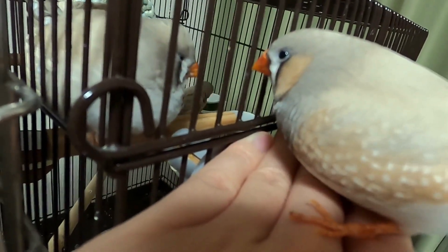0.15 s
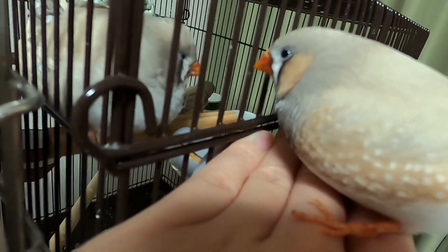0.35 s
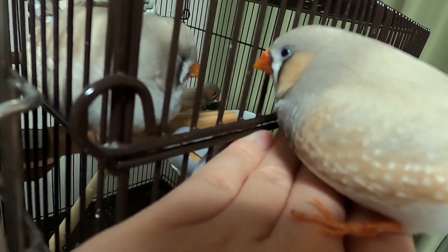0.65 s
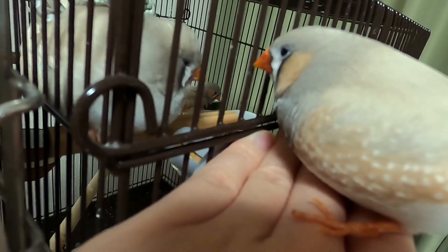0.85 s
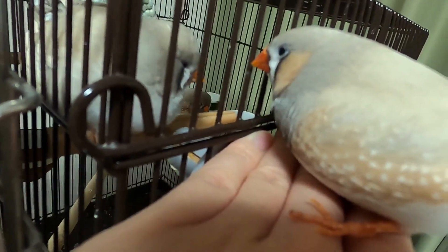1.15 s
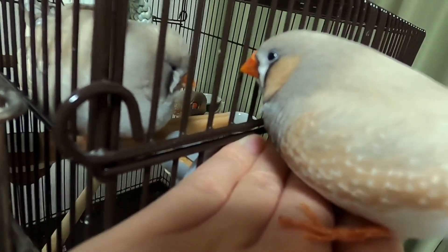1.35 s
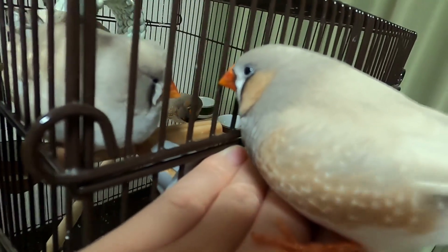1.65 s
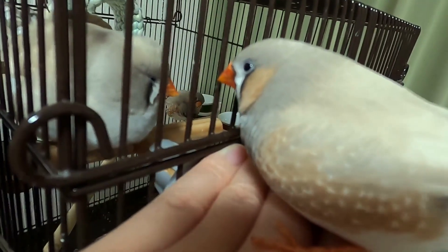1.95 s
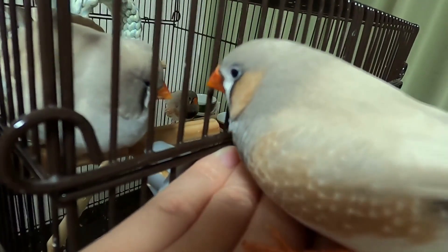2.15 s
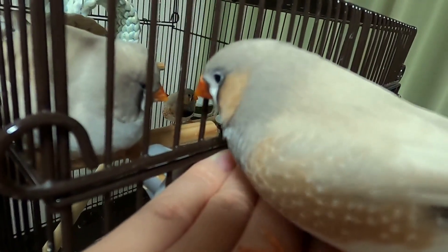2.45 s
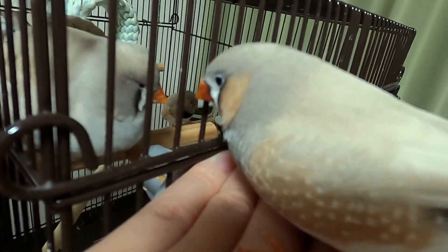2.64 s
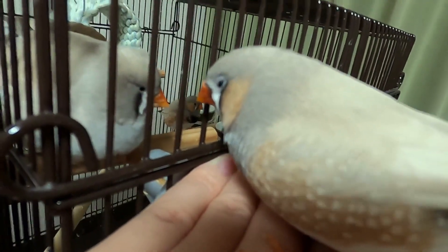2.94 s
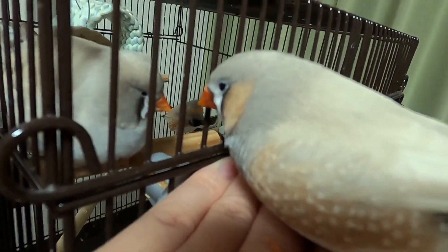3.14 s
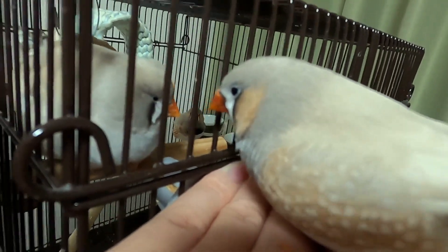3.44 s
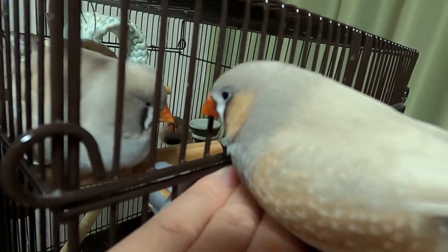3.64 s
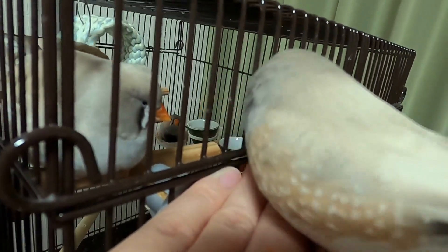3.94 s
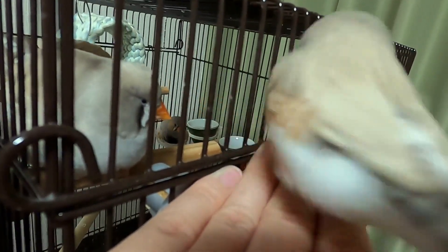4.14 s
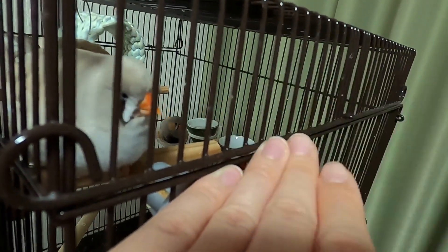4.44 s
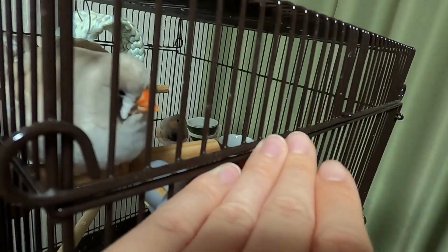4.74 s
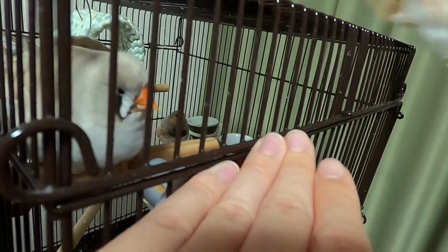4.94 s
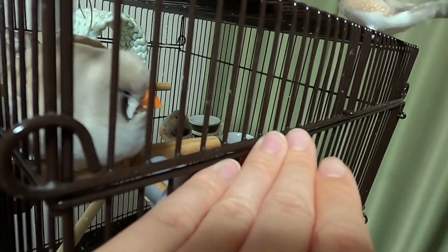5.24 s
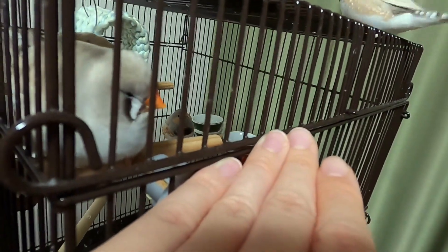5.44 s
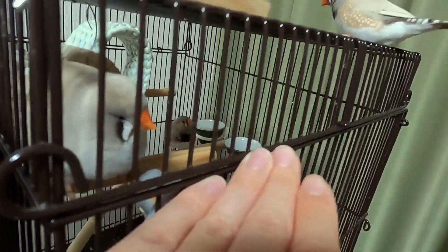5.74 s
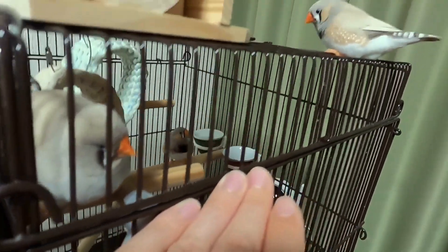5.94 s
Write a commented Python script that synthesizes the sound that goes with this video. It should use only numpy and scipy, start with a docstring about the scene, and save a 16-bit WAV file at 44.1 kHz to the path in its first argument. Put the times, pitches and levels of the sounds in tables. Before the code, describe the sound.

Small birds give short calls among faint cage wire rattles, then one flutters up close by and lands on the cage.

```python
"""A faint rattle of wire in a quiet room, then finches calling in and beside their cage, close to two
microphone ports. Each call is a train of syrinx pulses filtered by the throat; hops and pecks excite
the damped modes of the wires. One bird pushes off, its wingbeats and a turbulent gust strike the
ports, and it calls in flight and lands on the cage roof."""
import sys
import numpy as np
from scipy import signal
from scipy.io import wavfile
from scipy.ndimage import uniform_filter1d

SR = 44100
rng = np.random.default_rng(int(sys.argv[2]) if len(sys.argv) > 2 else 0)


def to_wav(sig):
    """Store sig (one row per channel, or 1-D mono) as 16-bit WAV at the path in sys.argv[1].

    Samples outside -1..1 are clipped; the rate is SR.
    """
    pcm = np.clip(np.atleast_2d(sig), -1, 1) * 32767
    pcm = np.round(pcm).astype(np.int16)
    wavfile.write(sys.argv[1], SR, pcm.T)  # frames by channels


N = 268304

# noise between the ports: (frequency [Hz], correlation [0-1]) and (frequency [Hz], L-R [dB])
COHERENCE = [(60, 0.82), (180, 0.6), (550, 0.71), (1650, 0.6), (4970, 0.4), (15000, 1)]
NOISE_BALANCE = [(60, -1.5), (240, -3.5), (950, -1), (3770, 3.5), (15000, 0)]
# reverberation: (frequency [Hz], T60 [s])
ROOM_DECAY = [(300, 0.23), (1500, 0.28), (4000, 0.22), (10000, 0.08)]
# noise spectra: (frequency [Hz], relative density [dB])
AIR_SPECTRUM = [(35, -36), (60, -7), (105, -26), (179, 8.5), (272, 2), (385, -1), (475, -9), (613, -24.5),
                (849, -10), (1100, -16), (1230, -22.5), (1960, -47), (3840, -37), (7720, -32.5),
                (15500, -70.5)]
SHUFFLE_SPECTRUM = [(290, -28.5), (500, 4), (874, -10), (1080, 1.5), (1470, -2.5), (1750, 0), (2310, -7.5),
                    (2930, -13), (3130, -14), (12000, -37), (15600, -64), (22000, -120)]
RING_SPECTRUM = [(90, -50), (200, -20), (245, -12), (268, 0), (295, -14), (400, -40), (1000, -100)]
THRUM_SPECTRUM = [(80, -40), (135, -8), (160, 0), (200, -4), (260, -25), (1000, -100)]
JANGLE_SPECTRUM = [(1470, -34), (2600, -3.5), (4500, -9), (7100, -11), (12200, -26.5), (15500, -46)]  # small links; also feather tips
PUSH_SPECTRUM = [(1000, -35), (1600, -8.5), (2060, 3), (2500, -14.5), (2950, -9.5), (3600, -22),
                 (4250, -12), (5300, -23.5), (7500, -45), (12000, -75)]
GUST_SPECTRUM = [(12, -29.5), (30, 5.5), (110, -2), (190, 2), (400, -5.5), (800, -16), (1300, -29),
                 (1800, -43), (2600, -62), (6000, -115)]
SWISH_SPECTRUM = [(180, -36.5), (300, -4), (877, -7), (985, 1.5), (1090, -5.5), (1750, -6), (1940, -12.5),
                  (3070, -16), (4880, -29), (11300, -53), (15500, -66.5)]
# background envelopes: (time [s], level [dB])
SHUFFLE_LEVELS = [(0, -67), (.19, -78), (.63, -76), (.79, -60), (.95, -76.5), (1.3, -61.5), (1.45, -78),
                  (1.75, -60.5), (2.17, -72), (2.5, -65), (3.3, -71.5), (3.8, -69), (4.3, -63.5),
                  (5.17, -66.5), (5.5, -77), (6.08, -76.5)]
RUMBLE_LEVELS = [(0, -86), (.7, -88), (1.3, -71), (1.75, -82), (2.15, -72), (2.55, -84), (3.4, -70),
                 (3.8, -83), (4.3, -70), (5.17, -69), (5.5, -86), (6.08, -86)]
# dull, distant scuffles: (time [s], level [dB], decay [s])
FAR_SCUFFLES = [(0.872, -56, 0.025), (1.602, -63, 0.24), (3.47, -53.5, 0.17), (5.1, -59.5, .1)]
# spells of a low ring and a duller thrum: (start [s], end [s], level [dB])
RING_SPELLS = [(0.03, 0.18, -64), (0.749, 0.892, -58.5), (1.231, 1.362, -56), (1.612, 1.845, -62),
               (2.478, 2.783, -60.5), (2.94, 3.22, -70.5), (3.497, 3.617, -53.5), (3.627, 3.756, -51)]
THRUM_SPELLS = [(3.5, 3.85, -61), (5.8, 6.04, -62.5)]
# wire modes: (frequency [Hz], level [dB]); their damping by the frame: (frequency [Hz], T60 [s])
WIRE_MODES = [(725, 0), (990, 0), (1300, -12), (1550, -10), (1700, 5.5), (1900, 8.5), (2060, 5.5),
              (2650, 2), (3040, -10), (3480, -4), (4200, 4.5), (4600, 3.5), (5200, -6), (5990, -3),
              (6800, 3), (7200, -3), (7900, -1), (9150, -1.5)]
WIRE_DECAY = [(1000, .06), (3000, .04), (9000, .025)]
# rattles: (time [s], level [dB], first wires [Hz], second wires [Hz], decay [s], jangle [dB], L-R [dB])
WIRE_RATTLES = [(.005, -57, 980, 7800, .024, -4.5, -1), (.196, -57.5, 3250, 2000, .043, -14, 4),
                (1.05, -59, 1205, 2740, .15, -16.5, 2.5), (1.216, -65, 7700, 1800, .06, 7, 2),
                (1.375, -72.5, 5960, 7850, .05, 1.2, 7), (1.677, -64, 7850, 1700, .031, -1.5, 4),
                (3.335, -61, 6750, 5200, .02, -4, 0), (3.375, -64, 6700, 7200, .06, -12, 0),
                (3.81, -70, 7300, 7900, .05, -8, 0), (3.906, -49.5, 1800, 4100, .048, -7, -1.2),
                (4.011, -51, 3040, 7200, .1, -9, 1.2), (4.091, -59, 1900, 2630, .027, -5, 7.5),
                (4.164, -50, 1950, 5990, .046, -10.5, 3.5), (5.038, -37, 3300, 2650, .03, -6, 2),
                (5.08, -51, 725, 1080, .22, -25, -1.5), (5.52, -61, 725, 2060, .08, -25, -1.5),
                (5.36, -68, 3480, 5200, .035, 3, -2.2), (5.556, -73, 5200, 1800, .025, 3, 0),
                (5.695, -56, 1700, 4670, .064, -17.5, 3), (5.825, -60, 1800, 2940, .045, -2.5, 8),
                (5.909, -58, 2060, 7200, .025, -19, 10.5)]
# claw and beak impacts: (time [s], peak [dB], centre [Hz], knock length [cycles], L-R [dB])
IMPACTS = [(.861, -61, 7000, 3.4, 2), (.886, -49, 3200, 2.9, -1), (1.47, -62, 3300, 1.1, -4),
           (1.605, -65, 6000, 2, 3), (1.73, -58.5, 5500, 1.8, 1), (2.465, -64, 5500, 1.5, 3),
           (2.532, -66, 5500, 1.5, 3), (2.592, -67, 5500, 1.5, 3), (2.647, -66, 5500, 1.5, 3),
           (3.427, -48, 2500, 0.5, -13), (3.912, -53, 4100, .8, 1.5), (4.161, -56, 5500, .8, .5),
           (4.413, -50, 1200, 1.1, -11), (4.447, -45, 2000, 8, -3), (4.458, -35, 1400, 1.5, -4.5),
           (4.461, -46.5, 8960, 2, -16), (4.484, -34, 3500, 0.45, -10), (4.839, -32, 2500, 1, -2),
           (4.878, -41.5, 1800, 0.44, -9), (4.988, -41.5, 1200, 3.4, 2), (5.043, -21, 3200, 0.8, 1),
           (5.567, -48, 2600, .45, 0)]
# gust at the left port, then the right:
# (peak time [s], rise [s], fall [s], turbulence [dB], buffet [Hz], buffet [dB])
PORT_GUSTS = [(4.5555, .009, .005, -12, 190, -7), (4.546, .017, .015, -11, 47, -9)]
# feathers in flight: (time [s], swish [dB], tip rustle [dB])
FEATHER_LEVELS = [(4.37, -69, -64), (4.41, -58.5, -61), (4.48, -56.5, -53.5), (4.545, -62, -66),
                  (4.64, -50.5, -61), (4.85, -50, -64), (4.95, -57.5, -67), (5.03, -55, -61),
                  (5.2, -56, -79)]
# bouts of wingbeats: (first peak [s], period [s], final pitch [Hz], extra pitch at the peak [Hz],
# first L-R [dB], settled L-R [dB], stroke peaks [dB])
WING_BOUTS = [(4.419, .04, 36, 8, -7, -7, [-26, -13, -24]),
              (4.58, .0401, 24.6, 28, 7, -1, [-17, -23, -16.5, -15.5, -17.5, -20, -25.5, -27, -28.5]),
              (5.007, .02, 29.5, 12, .4, .3, [-28, -34, -29])]
# throat responses: (frequency [Hz], harmonic level [dB])
NEAR_FORMANTS = [(260, -50), (450, -17), (557, -27.5), (1100, -3.5), (1650, -5.5), (2200, 1), (2800, -.5),
                 (3390, -5), (4090, -3.5), (6030, -33), (6620, -30), (8650, -30.5), (10300, -46),
                 (12200, -52), (14300, -80)]
CAGED_FORMANTS = [(560, -38.5), (1130, -13), (1700, -17), (2260, -5), (2830, 2), (3400, -11.5), (3950, -8),
                  (4500, -6), (5100, -16.5), (5700, -26), (6500, -33.5), (9000, -64)]
LOW_FORMANTS = [(470, -52), (800, -14.5), (1350, -6), (1620, -8), (1860, -0.5), (3680, -14.5), (3900, -9),
                (4620, -22), (6000, -42), (7800, -72), (13200, -120)]
FLYING_FORMANTS = [(600, -35), (1150, -7), (1750, -3), (2350, 1), (2950, -1.5), (3600, -2), (4200, -18),
                   (5000, -25), (7000, -40.5)]
# by bird: (throat response, rasp [rad], phase scatter [rad], L-R [dB], room feed [dB])
BIRDS = {"near": (NEAR_FORMANTS, .17, .3, .6, -8.5), "caged": (CAGED_FORMANTS, .15, 1.4, 4.5, -5),
         "low": (LOW_FORMANTS, .22, 1.2, 2.5, -4), "flying": (FLYING_FORMANTS, .38, .6, .6, -6)}
# call contour by bird, at arch depth 1: (pitch rise [s], start below top [share],
# sag 0.05 s after the top [share], swell [s], swell start [dB], attack [s], release [s])
CONTOURS = {"near": (.024, .12, .28, .02, -4, .007, .008), "caged": (.051, .18, .012, .095, -8, .014, .05),
            "low": (.025, .11, .12, .03, -4, .009, .015), "flying": (.022, .08, .09, .025, -6, .004, .01)}
# calls: (bird, start [s], length [s], effort [dB], top pulse rate [Hz], arch depth [factor])
CALLS = [("caged", .398, .17, -48, 565, 1.0), ("near", .692, .066, -45, 574, 1.0),
         ("caged", 1.14, .125, -53, 560, 1.0), ("low", 1.225, .075, -50, 461, 1.0),
         ("low", 1.568, .062, -53, 463, 1.1), ("caged", 1.765, .11, -56, 556, .9),
         ("near", 2.37, .069, -42, 573, 1.0), ("caged", 3.597, .065, -55, 562, .9),
         ("near", 3.65, .063, -40, 565, 1.0), ("flying", 4.678, .074, -38, 590, 1.0),
         ("flying", 4.93, .055, -49.5, 728, .15)]


def amp(db):
    """Decibels to amplitude ratio."""
    return 10 ** (np.asarray(db) / 20)


def unit_rms(x):
    """Normalisation to unit mean power."""
    return x / np.sqrt(np.mean(x ** 2) + 1e-20)


def read(points, hz):
    """Interpolation on a log-frequency axis."""
    f, value = np.transpose(points)
    return np.interp(np.log(hz + 1), np.log(f + 1), value)


def wobble(shape, hz):
    """Random modulation: noise low-passed at hz."""
    return unit_rms(signal.sosfilt(signal.butter(3, hz, fs=SR, output="sos"), rng.standard_normal(shape)))


def envelope(rows, column):
    """Smooth amplitude envelope from a dB column, silent outside the rows."""
    rows = np.asarray(rows)
    gain = amp(np.interp(np.arange(N) / SR, rows[:, 0], rows[:, column], left=-150, right=-150))
    return np.convolve(gain, np.hanning(200) / 100, "same")


def spells(rows):
    """Soft-edged gate, open from start to end of each row."""
    t = np.arange(N) / SR
    return uniform_filter1d(sum(amp(db) * (t > start) * (t < end) for start, end, db in rows), size=600)


def add(mix, start, sound, pan_db):
    """Superposition: a sound joins the mix with a left-right level difference."""
    part = mix[:, round(start * SR):][:, :sound.shape[-1]]
    part += amp([[pan_db / 2], [-pan_db / 2]]) * sound[..., :part.shape[1]]


def noise(spectrum, patchy_db, size=512, coherence=COHERENCE):
    """Partially coherent stereo noise whose spectrum drifts in patches."""
    frames, hz = 4 * N // size + 5, np.fft.rfftfreq(size, 1 / SR)
    a, b, c, d, patches = rng.standard_normal((frames, len(hz), 5)).T
    patches = unit_rms(uniform_filter1d(uniform_filter1d(patches, size=8, axis=0), size=12, axis=1))
    alike = np.clip(read(coherence, hz), -1, 1)[:, None]
    left = a + 1j * b
    right = alike * left + np.sqrt(1 - alike ** 2) * (c + 1j * d)
    lean_db = read(NOISE_BALANCE, hz)[:, None] * np.array([.5, -.5])[:, None, None]
    bins = np.array([left, right]) * amp(read(spectrum, hz)[:, None] + lean_db + patchy_db * patches)
    return unit_rms(signal.istft(bins, nperseg=size, noverlap=size * 3 // 4)[1][:, :N])


def room_tone():
    """Incoherent noises add: steady air, shuffling, a narrow low ring, a thrum and a slow rumble."""
    t = np.arange(N) / SR
    scuffles = sum(amp(db) * (t > s) * np.exp(-abs(t - s) / decay) * np.minimum(abs(t - s) / .006, 1)
                   for s, db, decay in FAR_SCUFFLES)
    shuffling = uniform_filter1d(envelope(SHUFFLE_LEVELS, 1) + scuffles, size=400)
    ring = spells(RING_SPELLS) * noise(RING_SPECTRUM, 1.2, size=4096, coherence=[(20, .85)])
    thrum = spells(THRUM_SPELLS) * noise(THRUM_SPECTRUM, 1.2, size=4096, coherence=[(20, .85)])
    rumble = noise([(15, -12.5), (30, -7.5), (70, -9.5), (110, -22), (300, -65)], 1.5, size=4096)
    rumble *= envelope(RUMBLE_LEVELS, 1) * amp(3 * wobble(N, hz=5))
    air = amp(-64) * noise(AIR_SPECTRUM, 1.5, size=1024)
    return air + shuffling * noise(SHUFFLE_SPECTRUM, 1.8) + ring + thrum + rumble


def reverberation(x):
    """Diffuse reflections of random sign decay exponentially, each band at its own rate."""
    taps = np.zeros((2, SR // 2))
    arrivals = np.arange(130, SR // 2 - 20, 20)
    arrivals = arrivals + rng.integers(0, 20, (2, len(arrivals)))
    np.put_along_axis(taps, arrivals, rng.choice([-1., 1.], arrivals.shape), 1)
    taps[1] = .56 * taps[0] + .94 * taps[1]
    hz, t, bins = signal.stft(taps, SR, nperseg=256)
    tail = signal.istft(bins * amp(-60 * t / read(ROOM_DECAY, hz)[:, None]), SR, nperseg=256)[1]
    return signal.fftconvolve(x, tail / np.linalg.norm(tail[0]), axes=1)[:, :N] * amp([[1.5], [-1.5]])


def rattles():
    """Modal ringing: a dying run of knocks excites two groups of damped wires, and small links jangle."""
    out, t = np.zeros((2, N)), np.arange(SR // 4) / SR
    knocks_per_s, detune = 900, .02
    jangle = noise(JANGLE_SPECTRUM, 2.5, size=256) * unit_rms(amp(1.8 * wobble(N, 250)))
    wire_hz, wire_db = np.transpose(WIRE_MODES)[:, :, None]
    decay = amp(wire_db - 60 * t / read(WIRE_DECAY, wire_hz))
    for start, db, first_hz, second_hz, fade_s, jangle_db, pan_db in WIRE_RATTLES:
        fade = np.exp(-(t / fade_s) ** 1.1) * (1 - np.exp(-t / .0033)) ** 2
        knocks = fade * rng.standard_normal(len(t)) * (rng.random(len(t)) < knocks_per_s / SR)
        struck = np.exp(-(np.log2(wire_hz / first_hz) / .16) ** 2)
        struck += amp(-14) * np.exp(-(np.log2(wire_hz / second_hz) / .22) ** 2)
        hz = wire_hz * (1 + detune * rng.standard_normal(wire_hz.shape))  # never quite the same wires
        ring = ((struck + .024) * decay * np.sin(2 * np.pi * hz * t)).sum(0)
        ring *= 1 - np.exp(-t / .0006)
        rattle = signal.fftconvolve(knocks, ring)[:len(t)]
        offset = rng.integers(N - len(t))
        hiss = amp(jangle_db) * fade * jangle[:, offset:offset + len(t)]
        add(out, start, amp(db) * (rattle / abs(rattle).max() + hiss), pan_db)
    return out


def ticks():
    """Impact of claw or beak: one heavily damped oscillation, roughened by a brief scrape."""
    out, t = np.zeros((2, N)), np.arange(600) / SR
    for start, db, hz, cycles, pan_db in IMPACTS:
        age = t * hz / cycles  # in knock lengths
        knock = age * np.exp(-2.5 * age) * np.sin(2 * np.pi * hz * t)
        scrape = signal.fftconvolve(knock, np.exp(-t / .0009) * rng.standard_normal(len(t)))
        add(out, start, amp(db) * scrape / abs(scrape).max(), pan_db)
    return out


def push_off(start_s=4.222, rise_s=.017, level_db=-36.5, fade_db_per_s=190):
    """Stick-slip friction: about a hundred uneven slips a second, coloured by perch and wires."""
    slip_hz = 100 + 35 * wobble(N, 30)
    slips = 1 + .4 * np.sin(2 * np.pi * np.cumsum(slip_hz) / SR)
    t = np.arange(N) / SR - start_s
    stroke = np.clip(t / rise_s, 0, 1) ** 2 * amp(level_db - fade_db_per_s * np.maximum(t - rise_s, 0))
    return noise(PUSH_SPECTRUM, .86, coherence=[(20, 1)]) * slips * stroke * amp([[2.5], [-2.5]])


def gust(wake_db=-30, wake_s=.05):
    """Turbulence crosses from the right port to the left, buffets each capsule and leaves a weak wake."""
    peak, rise, fall, db, buffet_hz, buffet_db = np.transpose(PORT_GUSTS)[:, :, None]
    t = np.arange(N) / SR - peak
    blast = np.exp(-(t / np.where(t < 0, rise, fall)) ** [[2], [4]])
    wake = amp(wake_db) * np.exp(-abs(t) / np.where(t < 0, rise, wake_s))
    buffet = amp(buffet_db) * blast * np.cos(2 * np.pi * buffet_hz * t + [[np.pi], [-.6]])
    turbulence = noise(GUST_SPECTRUM, .15, coherence=[(20, .17), (2000, .21)])
    return turbulence * (amp(db) * blast + wake) + buffet


def wings(lead_s=.026, sweep_s=.008):
    """Displaced air: each downstroke is a pressure wave of falling pitch, with a swish of feathers."""
    pressure, strokes = np.zeros((2, N)), np.zeros((2, N))
    t = np.arange(-lead_s, .04, 1 / SR)
    swell = np.where(t < 0, np.exp(t / .012), np.exp(-(t / .0222) ** 2))
    swell *= signal.windows.tukey(len(t), .15)
    for first_s, period_s, end_hz, sweep_hz, first_pan_db, settled_db, peaks in WING_BOUTS:
        for k, db in enumerate(peaks):
            turns = end_hz * t + sweep_hz * sweep_s * (1 - np.exp(-t / sweep_s))
            turns += .039 * wobble(len(t), 120)
            start = first_s + k * period_s - lead_s
            pan_db = settled_db + (first_pan_db - settled_db) * .4 ** k
            add(pressure, start, amp(db) * swell * np.cos(2 * np.pi * turns), pan_db)
            add(strokes, start, np.exp(-((t + .012) / .013) ** 2), 0)  # the swish leads the pressure
    swish = noise(SWISH_SPECTRUM, 2.5, size=256) * envelope(FEATHER_LEVELS, 1) * (.58 + 1.3 * strokes)
    rustle = noise(JANGLE_SPECTRUM, 2.2, size=256) * envelope(FEATHER_LEVELS, 2) * (.87 + .49 * strokes)
    return pressure + swish + rustle * amp([[-1.5], [1.5]])


def call(bird, length, effort_db, top_hz, depth, throat, rough, scatter):
    """Source and filter: jittering syrinx pulses on a pitch arch, harmonics weighted by the throat."""
    rise_s, below, sag, swell_s, swell_db, attack_s, release_s = CONTOURS[bird]
    t = np.arange(0, length, 1 / SR)
    scoop = below * np.maximum(1 - t / rise_s, 0) ** 1.5
    droop = sag * (np.maximum(t - rise_s, 0) / .05) ** 1.5
    hz = top_hz * (1 - depth * (scoop + droop))
    effort = amp(effort_db - 14 * droop + swell_db * np.maximum(1 - t / swell_s, 0))  # tires as it sags
    gate = np.clip(np.minimum(t / attack_s, (length - t) / release_s), 0, 1)
    k = np.arange(1, 24)[:, None]  # harmonic numbers
    turns = np.cumsum(hz) / SR + .003 * wobble(len(t), 250)
    shape = (len(k), len(t))
    level_db = read(throat, k * hz) + (2 + .5 * scatter) * wobble(shape, 30)
    rasp = rough * (1 + 5 * (1 - hz / top_hz)) * (1 + (k * hz / 5500) ** 2)  # huskier below top pitch
    # throat delay; bars and walls scatter the pulse of a farther bird
    lag = .45 * k + scatter * rng.standard_normal(k.shape)
    phase = 2 * np.pi * k * turns - lag + rasp * wobble(shape, 300)
    return effort * gate * unit_rms((amp(level_db) * np.cos(phase)).sum(0))


def finches():
    """Direct sound and room feed: their ratio cues each bird's distance, the L-R difference its side."""
    direct, room_feed = np.zeros((2, N)), np.zeros((2, N))
    for bird, start, length, effort_db, top_hz, depth in CALLS:
        throat, rough, scatter, pan_db, room_db = BIRDS[bird]
        sound = call(bird, length, effort_db, top_hz, depth, throat, rough, scatter)
        add(direct, start, sound, pan_db)
        add(room_feed, start, amp(room_db) * sound, 0)
    return direct, room_feed


def scene():
    """Superposition of birds and cage, their reflections, wings, gust and room tone."""
    calls, room_feed = finches()
    wires = rattles() + ticks() + push_off()
    close = calls + wires
    mirrored = close[::-1] * [[1], [-1]]
    for delay_s, db in ((.0011, -14.5), (.0027, -13.5)):  # early reflections off hand and cage tray
        add(close, delay_s, amp(db) * mirrored, 0)
    return close + reverberation(room_feed + amp(-12) * wires.mean(0)) + wings() + gust() + room_tone()


def record(dry, ceiling=1.1, cutoff_hz=15600):
    """Saturation in the capsules rounds the strongest pressure peaks; a low-pass limits the band."""
    rounded = ceiling * np.tanh(dry / ceiling)
    lowpass = signal.firwin(511, cutoff_hz, window=("kaiser", 9), fs=SR)
    return signal.oaconvolve(rounded, lowpass[None], "same")


dry = scene()
out = record(dry)
to_wav(out)
```